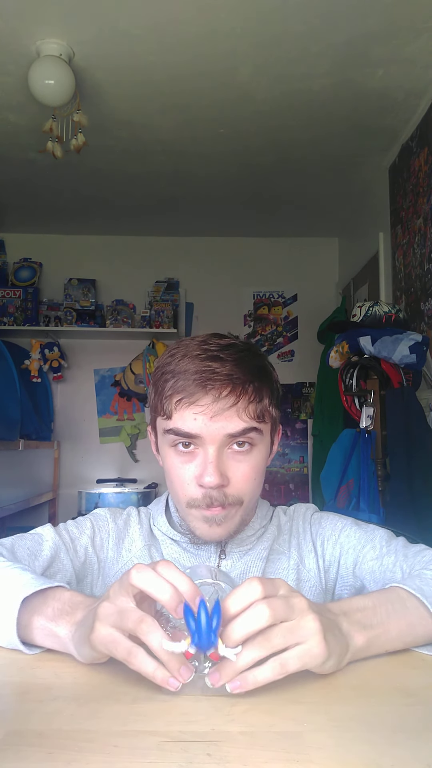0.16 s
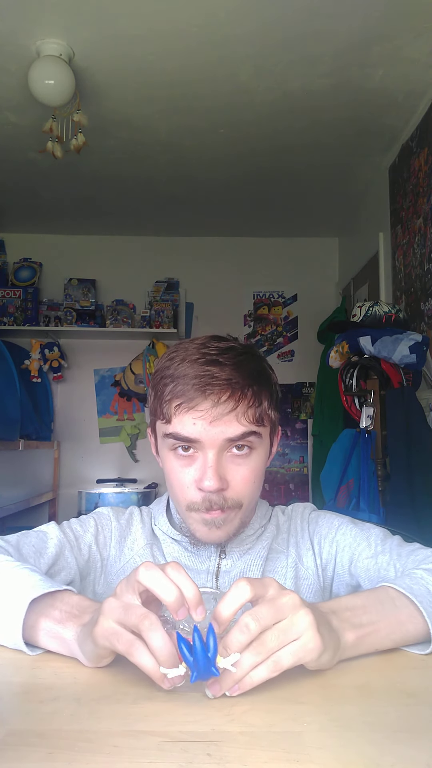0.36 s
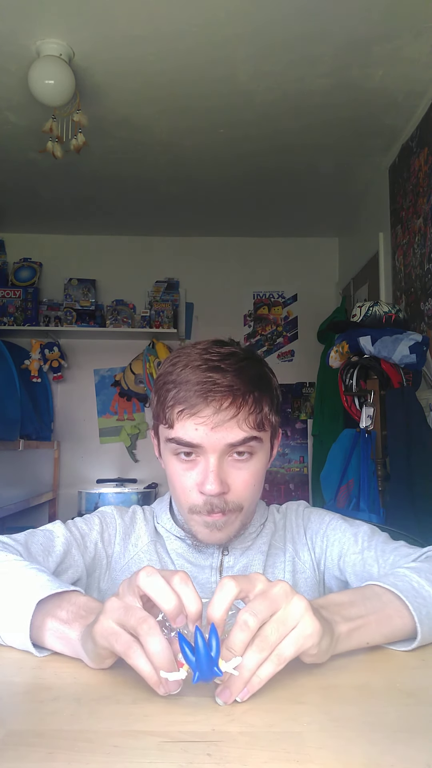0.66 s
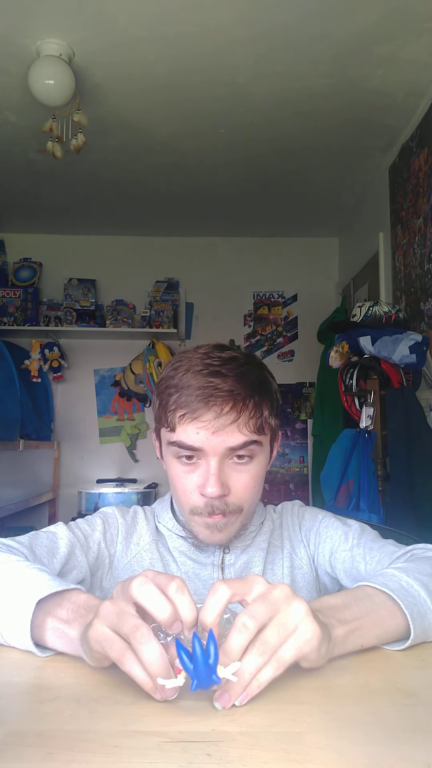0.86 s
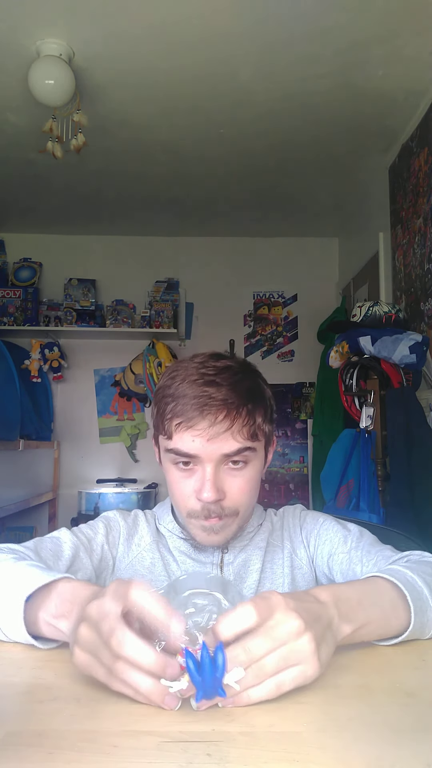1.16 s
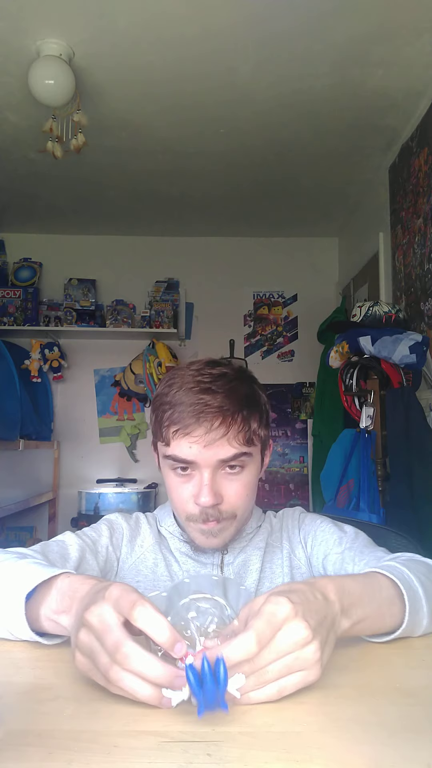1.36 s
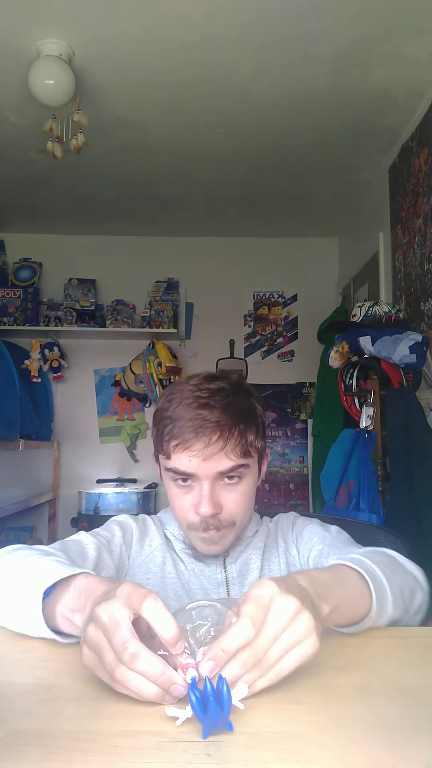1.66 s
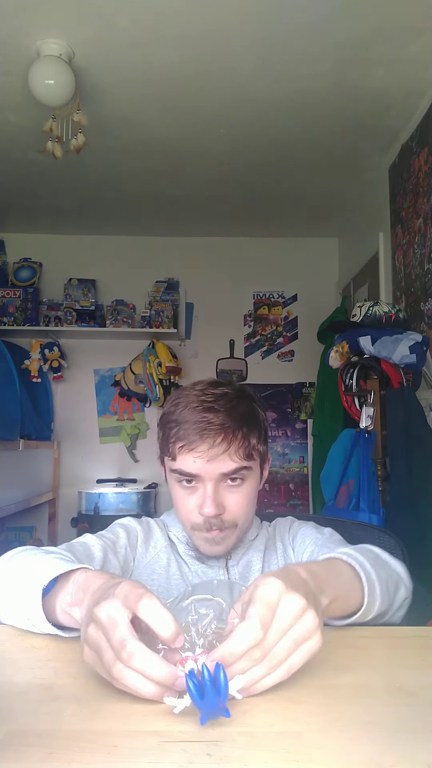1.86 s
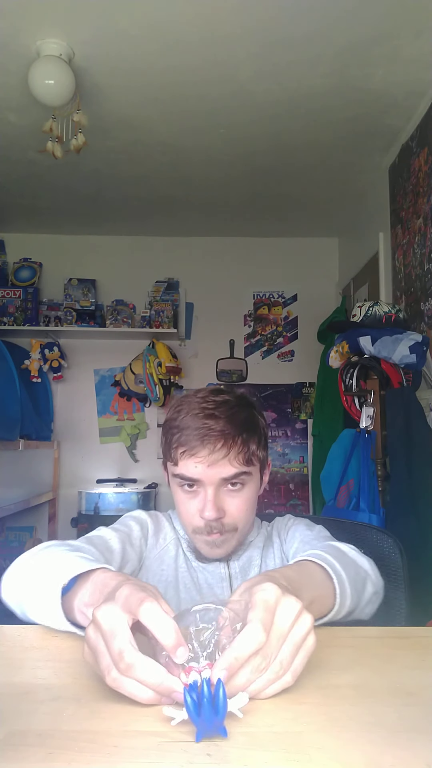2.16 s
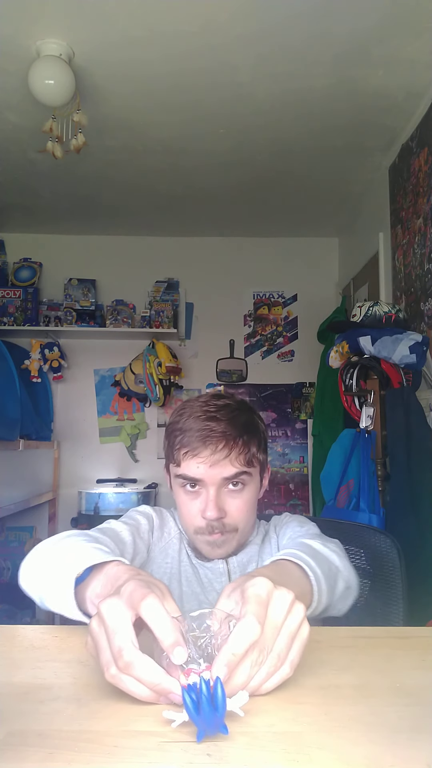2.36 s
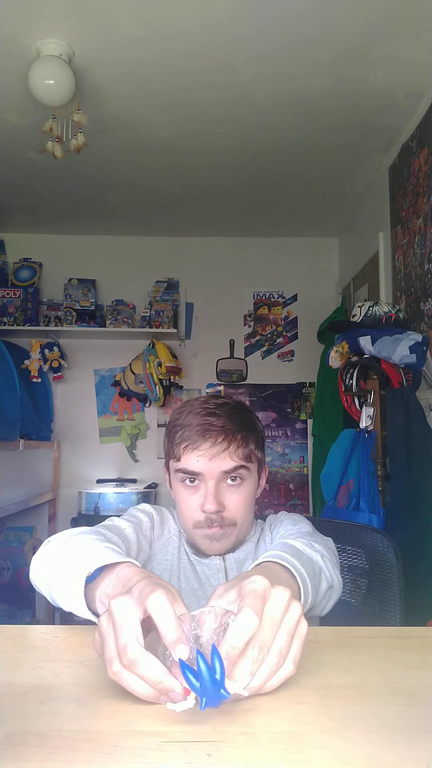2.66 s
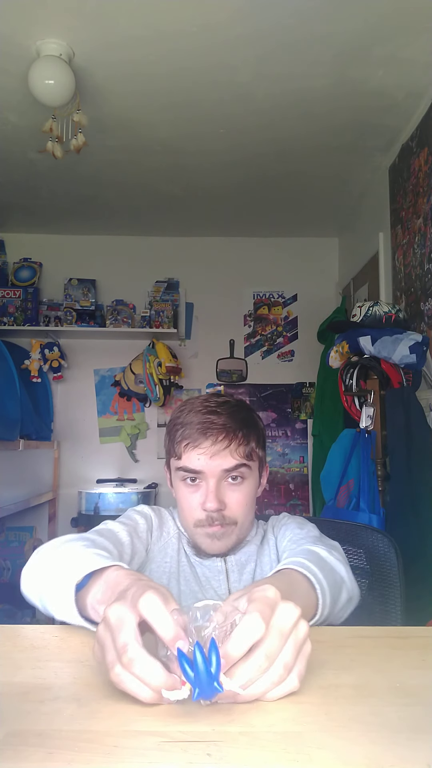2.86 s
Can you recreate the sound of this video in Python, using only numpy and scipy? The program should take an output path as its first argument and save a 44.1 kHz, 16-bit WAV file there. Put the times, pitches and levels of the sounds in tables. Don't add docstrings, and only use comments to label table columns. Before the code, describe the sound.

Stiff clear plastic shell crinkles and crackles sharply as hands twist and pry it at a table

```python
import sys
import numpy as np
from scipy import signal
from scipy.fft import rfft, irfft, next_fast_len
from scipy.io import wavfile
from scipy.ndimage import uniform_filter1d, map_coordinates

SR = 44100
rng = np.random.default_rng(int(sys.argv[2]) if len(sys.argv) > 2 else 0)


def dump_mix(stems):
    frames = np.atleast_2d(stems).T
    limited = np.clip(frames, -1, 1)
    pcm = np.round(limited * 32767).astype(np.int16)
    wavfile.write(sys.argv[1], SR, pcm)


def natural_amplitude(level_db):
    exponent = np.asarray(level_db, float) / 20
    return 10 ** exponent


N = 132300

# (frequency [Hz], pitch scatter [ln], T60 [s], level in a pop [dB])
SHELL_MODES = [(781.6, 0.018, 0.015, 4), (949, 0.037, 0.011, -22.5), (1294, 0.058, 0.011, -3),
               (1493, 0.016, 0.012, -4)]
CRACK_T60_S = 0.01
FIZZ_T60_S = 0.0059


def along(points, hz):
    f, v = np.transpose(points)
    return np.interp(np.log(hz + 1), np.log(f + 1), v)


def filtered(x, response):
    m = next_fast_len(N + SR // 2)
    return irfft(rfft(x, m) * response(np.fft.rfftfreq(m, 1 / SR)), m)[..., :N]


def wobble(knots_per_s):
    knots = rng.standard_normal(int(N * knots_per_s / SR) + 4)
    return map_coordinates(knots, [np.arange(N) * knots_per_s / SR])


def rings(s, db, hz, t60_s, rise_s, size):
    t = np.arange(size) / SR
    hz = np.clip(hz, 40, SR / 2.2)[:, None]
    t60_s = np.reshape(t60_s, (-1, 1))
    envelope = natural_amplitude(db[:, None] - 60 * t / t60_s) * (1 - np.exp(-t / rise_s)) ** 2
    wave = envelope * np.sin(2 * np.pi * hz * t)
    start = np.round(np.clip(s, 0, N / SR) * SR).astype(int)
    at = start[:, None] + np.arange(size)
    return np.bincount(at.ravel(), wave.ravel(), N + size + 1)[:N]


def scatter(count, clump_db, spread_db):
    # (time [s], effort [dB])
    effort = [(0, -34), (.04, -59), (.125, -68), (.15, -50.5), (.2, -30), (.55, -33.5), (.66, -34),
              (.76, -34), (1.2, -32.5), (1.3, -50), (1.335, -83), (1.362, -77), (1.375, -48.5),
              (1.6, -31.5), (1.9, -40), (2.2, -33), (2.65, -36), (3, -41.5)]
    u = rng.random((count, 2))
    s = u[:, 0] * (N - 1) / SR
    clump = clump_db * (wobble(13.0) + wobble(44.72))
    db = np.interp(s, *np.transpose(effort)) + clump[(s * SR).astype(int)]
    return s, db - spread_db * np.log(u[:, 1] + 1 / 30)


def shell(s, db, mix_db):
    z = rng.standard_normal((len(s), len(SHELL_MODES), 2))
    out = 0
    for k, (hz, wide, t60_s, _) in enumerate(SHELL_MODES):
        mode_db = db + mix_db[k] + 2.97 * z[:, k, 1]
        out = out + rings(s, mode_db, hz * np.exp(wide * z[:, k, 0]), t60_s, rise_s=0.00089, size=560)
    return out


def cracks(s, db, tilt_db, t60_s, smear_s, count, peak_hz=None):
    low_hz, high_hz = 2000, 15000
    u = rng.random((len(s), count))
    late = rng.exponential(size=(len(s), count)) ** 2
    hz = low_hz * (high_hz / low_hz) ** ((np.arange(count) + u) / count)
    level_db = db[:, None] + tilt_db / (1 + (4500 / hz) ** 6) - 3 * late
    if peak_hz is not None:
        level_db = level_db + 8 * np.exp(-(np.log(hz / peak_hz[:, None]) / 0.25) ** 2)
    s = s[:, None] + smear_s * late
    return rings(s.ravel(), level_db.ravel(), hz.ravel(), t60_s, rise_s=0.0001, size=220)


def crackle():
    s, db = scatter(count=1900, clump_db=1.5, spread_db=3)
    body = shell(s, db + 1, mix_db=(-4, 3.5, 4, 0.5))
    return np.array([body, cracks(s, db - 7, -14.5, FIZZ_T60_S, smear_s=0.00035, count=5)])


def pops():
    # (time [s], peak [dB], two low modes over it [dB])
    dents = [(0.06, -24, -3), (0.14, -16.5, -16.5), (0.181, -13, -9), (0.201, -8, -31),
             (0.214, 2, -20), (0.225, -12, -9), (0.236, -9, -16), (0.244, -7, -27), (0.256, -1, -6.5),
             (0.377, -10.5, -2), (0.387, 2.5, -3.5), (0.425, -2, -26), (0.47, -9, -26),
             (0.502, -5, -10), (0.514, 4.5, -15.5), (0.529, 6.5, -12), (0.613, 0, -9),
             (0.638, -18, 3), (0.689, -13.5, -39), (0.709, -2, -16), (0.729, -5.5, -41),
             (0.848, -10, -5),
             (0.925, -9.5, -19), (0.938, 1.5, -9.5), (0.964, -5, -17), (1.042, -10, -11),
                    (1.059, -26, 3.5), (1.074, -7.5, -10.5), (1.08, -4, -18), (1.112, -16.5, 3),
                    (1.119, -2.5, 1.5), (1.208, 2.5, -9.5), (1.369, -12, -11.5), (1.407, -13.5, -8),
                    (1.42, -18, -10), (1.488, -4.5, -22.5), (1.549, -15.5, -5), (1.58, -18, 0),
                    (1.591, -10, -2.5), (1.622, -10, -13), (1.675, 5.5, -10.5), (1.742, -6, -14.5),
                    (1.931, -11, -13.5),
             (1.992, -11.5, 1), (2.042, -9, -6.5), (2.061, -11, -4.5), (2.082, -10, -7),
                  (2.154, -12, -5), (2.175, -12.5, 5.5), (2.186, -11, 0), (2.229, -6.5, -20),
                  (2.251, -3, -8), (2.282, -22, -3), (2.371, -14, -24), (2.405, -7, -5.5),
                  (2.486, -18, -19), (2.566, 5.5, -17.5), (2.622, -11.5, -25), (2.647, -11, -9),
                  (2.688, -9.5, -8.5), (2.7631, -7.5, -6.5), (2.7671, 9, -15), (2.779, -5.5, -23),
                  (2.972, -13.5, -16), (2.9935, -11, -16)]
    # (time [s], peak [dB])
    dents_light = [(0.002, -23), (0.01, -24), (0.016, -30), (0.077, -22), (0.188, -20), (0.586, -18.5),
                   (0.661, -37), (0.753, -14), (0.78, -25), (0.834, -7.5), (0.904, -39), (0.975, -10),
                   (1.014, -12.5), (1.183, -24), (1.261, -14.5), (1.273, -16.5), (1.302, -26.5),
                   (1.428, -20), (1.478, -19.5), (1.729, -21), (1.894, -37), (1.941, -16), (1.951, -10),
                   (2.192, -8), (2.346, -36), (2.584, -20), (2.607, -16), (2.634, -14), (2.652, -11.5),
                   (2.668, -15), (2.678, -17), (2.872, -18), (2.944, -27)]
    light = [(s, db + 1, -13) for s, db in dents_light]
    s, db, low_db = np.transpose(dents + light)
    mode_db = [mode[3] for mode in SHELL_MODES]
    mix_db = [low_db + mode_db[0], low_db + mode_db[1], mode_db[2], mode_db[3]]
    snap_db, rattle_db, rattle_s = -0.5, -16, 0.012
    body = shell(s, db + snap_db, mix_db)
    for late in rng.exponential(size=(len(s), 4)).T:
        body = body + shell(s + 0.002984 + rattle_s * late, db + snap_db + rattle_db - 6 * late, mix_db)
    return np.array([body, cracks(s, db - 33, -3.6, CRACK_T60_S, smear_s=0.0045, count=16)])


def creases():
    # (time [s], peak [dB], pitch [Hz])
    crease_ticks = [(.059, -33.5, 7800), (.1408, -34.5, 3430), (0.1811, -24.5, 4060), (0.2265, -20, 7300),
                    (.2853, -22.5, 7600), (0.3777, -18, 8750), (0.389, -21, 3600), (0.4265, -16, 8200),
                    (.5043, -15.5, 8700), (0.5237, -20.5, 8500), (0.5285, -22, 7100), (.585, -30, 8600),
                    (0.6054, -22.5, 8100), (.66, -15.5, 7150), (.665, -25, 2950), (2.7657, -15.5, 8000),
                    (2.768, -20, 4550), (2.772, -18, 2200), (0.9364, -33, 3000), (0.9731, -18.5, 6360),
                    (1.059, -17, 9000), (1.183, -29, 3120), (1.2063, -17.5, 3310), (1.2624, -25, 3570),
                    (1.37, -39, 2920), (1.488, -17.5, 3650), (1.675, -23, 6260), (1.928, -38, 6050),
                    (2.1525, -24.5, 2960), (2.2514, -21, 4160), (2.719, -20.5, 8460), (2.7661, -8.5, 2900),
                    (2.882, -23.5, 8100), (2.9755, -21, 4700),
                    (0.0034, -34, 3450), (0.164, -33, 7800), (0.3124, -44, 3560), (0.616, -46, 3080),
                   (1.1215, -26, 3030), (1.1783, -40, 3200), (1.3, -41, 5650), (1.3524, -64, 3080),
                   (1.4178, -34, 8100), (1.4652, -46, 3530), (1.5339, -38, 3060), (1.6177, -32, 3020),
                   (1.772, -33, 3050), (1.8931, -65, 3140), (2.105, -29, 3120), (2.3463, -45, 3100),
                   (2.4773, -31, 3040), (2.5825, -29, 5740), (2.6267, -22.5, 5540), (2.9083, -29, 7750),
                   (2.9439, -26.5, 7900)]
    s, db, hz = np.transpose(crease_ticks)
    ticks = cracks(s, db - 7.5 - 9, -3.4, CRACK_T60_S, smear_s=0.0003, count=40, peak_hz=hz)
    ring_db, ring_cycles = -14, 82
    for detune in (0.96, 1, 1.05):
        ticks = ticks + rings(s, db + ring_db, hz * detune, ring_cycles / hz, rise_s=0.00019, size=1500)
    s, db = scatter(count=1000, clump_db=3.0, spread_db=3)
    fizz = [cracks(s, db - 11, 2.5, FIZZ_T60_S, smear_s=0.0012, count=7) for port in "LR"]
    return ticks + np.array(fizz)


def table():
    # (time [s], peak [dB], pitch [Hz])
    thumps = [(.004, -50, 297), (.065, -50, 296), (0.229, -35, 408), (.64, -46, 169), (.74, -44, 173),
              (1.045, -44, 180), (1.875, -46.5, 147), (1.94, -44, 146), (0.611, -35, 412),
              (1.202, -35, 260), (1.41, -37.5, 341), (1.575, -31, 240), (1.984, -24.5, 236),
              (2.293, -27.5, 254), (2.4, -40, 108), (2.399, -38, 426), (2.56, -35, 420), (2.761, -28, 430)]
    thump_db, rub_db = 5, -11.5
    top_hz, top_t60_s = 163, 0.13
    s, db, hz = np.repeat(thumps, 8, axis=0).T
    z = rng.standard_normal((len(s), 3))
    late = abs(z[:, 0])
    s = s + 0.002 + 0.02218 * late
    knock_hz = hz * np.exp(0.249 * z[:, 1] + 0.12 * (0.6 - late))
    knock = rings(s, db + thump_db - 5.0 - 4 * late, knock_hz, 0.061, rise_s=0.00068, size=3000)
    top_db = db[::3] + thump_db - 11 - 0.07 * np.maximum(hz[::3] - 270, 0)
    top = rings(s[::3], top_db, top_hz * np.exp(0.035 * z[::3, 2]), top_t60_s, rise_s=0.0016, size=9000)
    s, db = scatter(count=300, clump_db=-0.2, spread_db=3.5)
    rub_hz = 282.4 * np.exp(0.5 * rng.standard_normal(len(s)))
    rub = rings(s, db + rub_db, rub_hz, 0.022, rise_s=0.0019, size=2500)
    hum = rings(s[::6], db[::6] + rub_db + 1, top_hz + 0 * s[::6], top_t60_s, rise_s=0.013, size=9000)
    return knock + top + rub + hum


def hiss():
    # (frequency [Hz], density [dB per Hz])
    hiss_colour = [(35, -38), (60, 0.5), (1630, -7), (4420, -28.5), (4740, -51), (5320, -13),
                   (15500, -20.5)]
    noise = filtered(rng.standard_normal((2, N)), lambda hz: natural_amplitude(along(hiss_colour, hz)))
    return natural_amplitude(-62) * noise / np.sqrt(np.mean(noise ** 2) + 1e-20)


def room(x):
    # (frequency [Hz], T60 [s])
    room_decay = [(200, 0.14), (1500, 0.086), (4000, 0.25), (12000, 0.047)]
    block, delay = SR // 5, 150
    out = np.zeros((2, N + SR))
    for at in range(0, N, block):
        hz, t, z = signal.stft(rng.standard_normal((2, SR // 4)), SR, nperseg=256)
        decay = natural_amplitude(-60 * t / along(room_decay, hz)[:, None])
        tail = signal.istft(z * decay, SR, nperseg=256)[1]
        tail = tail / np.linalg.norm(tail[0])
        wet = signal.fftconvolve(np.atleast_2d(x)[:1, at:at + block], tail, axes=1)
        out[:, at + delay:at + delay + wet.shape[1]] += wet
    return out[:, :N]


def ports(x):
    # (frequency [Hz], level [dB])
    left_colour = [(300, -0.5), (2100, 6.5), (2450, 3), (2950, 5.5), (3600, 0), (5200, 3.5), (7800, 8),
                   (15000, -3.5)]
    right_colour = [(300, -1.5), (2000, 6), (2450, 4), (2950, 5.5), (3500, -4), (5200, 4), (8000, -6.5),
                    (15000, 0.5)]
    lag_s, split_hz = 0.0002892, 1946

    def response(hz):
        late = np.exp(-2j * np.pi * hz * lag_s / (1 + (split_hz / (hz + 1)) ** 12))
        return [natural_amplitude(along(left_colour, hz)) * late, natural_amplitude(along(right_colour, hz))]
    return filtered(x, response)


def hush():
    releases = [
        .376,
        .658,
        .936,
        1.205,
        1.674,
        1.927,
        2.563,
        2.761,
    ]
    ahead_s = np.array(releases)[:, None] - np.arange(N) / SR
    held = ((ahead_s > 0) & (ahead_s < 0.010)).any(axis=0)
    return natural_amplitude(-8 * uniform_filter1d(held * 1., size=140))


def scene():
    # (frequency [Hz], level [dB])
    shell_colour = [(100, 7.5), (600, -4.5), (750, -4), (1650, -1.5), (1900, -4.5), (5000, 36)]
    room_low_db, room_side_db, room_treble_db = -8.5, -4, -8
    opposite = np.array([[1], [-1]])
    body, sharp = pops() + crackle()
    body = filtered(body, lambda hz: natural_amplitude(along(shell_colour, hz)))
    mid, side = room(body)
    body = ports(body + natural_amplitude(room_low_db) * mid) + natural_amplitude(room_low_db + room_side_db) * side * opposite
    sharp = sharp + creases()
    sharp = ports(sharp + natural_amplitude(room_treble_db) * room(sharp))
    wood = table()
    deep = filtered(wood, lambda hz: 1j * (hz < 220))
    wood = wood * natural_amplitude([[3], [-1]]) + natural_amplitude(4) * deep * opposite
    return (body + sharp) * hush() + wood + hiss()


def roll_off(x):
    return signal.sosfilt(signal.butter(12, 16650, fs=SR, output="sos"), x)


def record(dry):
    # (frequency [Hz], width [Hz], level [dB])
    notches = [(4730, 204, -6), (12200, 200, -4), (14050, 400, -14)]
    ceiling, knee = 0.96, 5
    low_cut_hz, top_hz = 96, 15500
    x = dry / (1 + abs(dry / ceiling) ** knee) ** (1 / knee)
    x = filtered(x, lambda hz: (1j * hz / (low_cut_hz + 1j * hz)) ** 3)

    def notched(hz):
        dips_db = sum(db * np.exp(-((hz - at) / wide) ** 2) for at, wide, db in notches)
        return natural_amplitude(-24 * (hz > top_hz) + dips_db)
    return roll_off(filtered(x, notched))


dry = scene()
out = record(dry)
dump_mix(out)
```